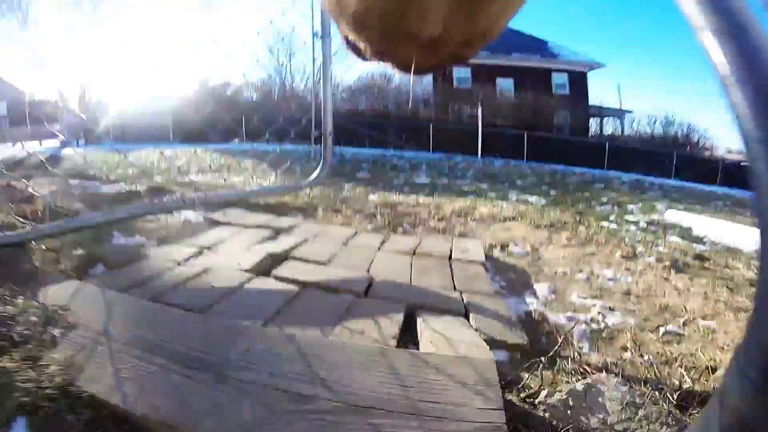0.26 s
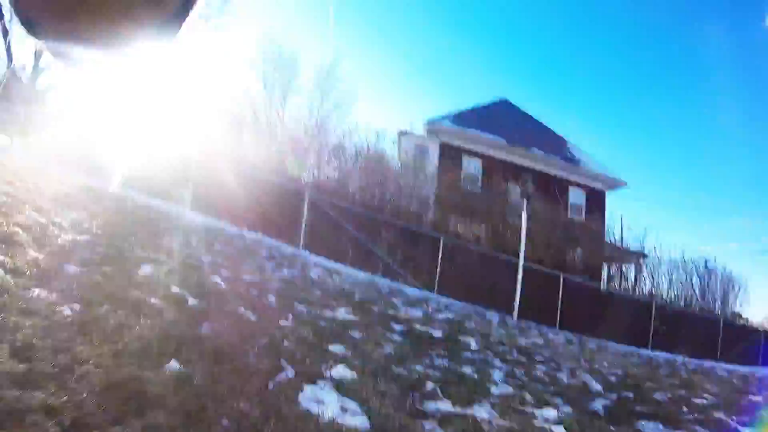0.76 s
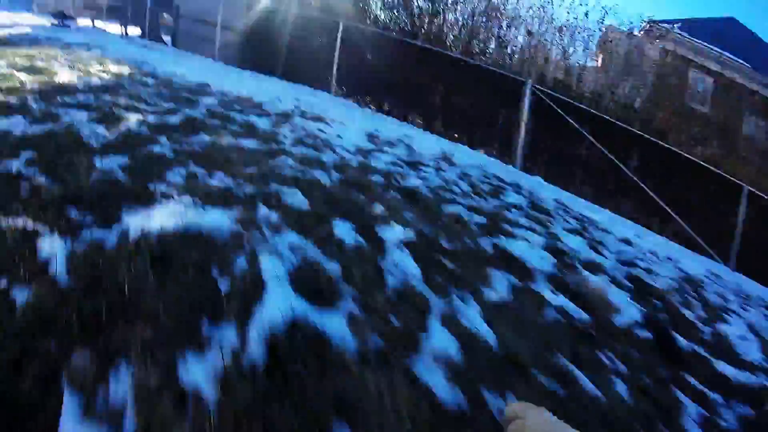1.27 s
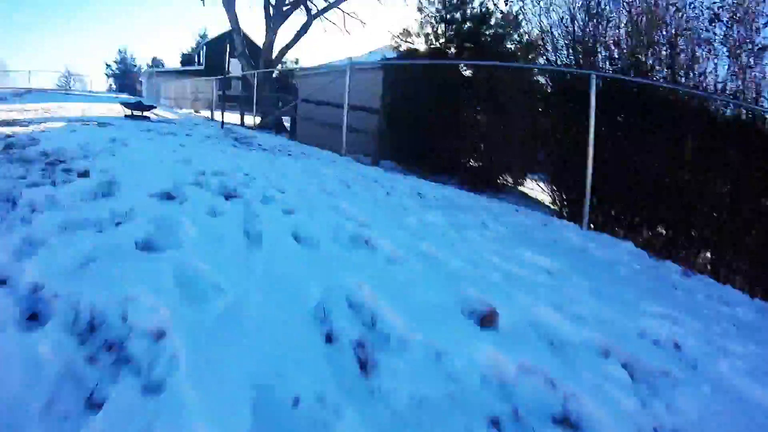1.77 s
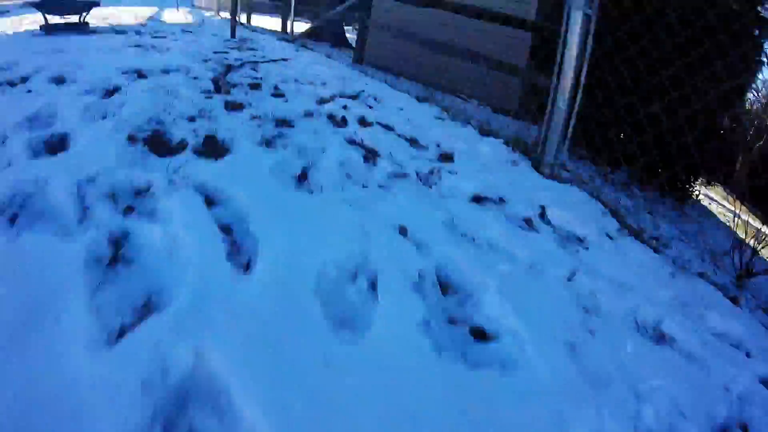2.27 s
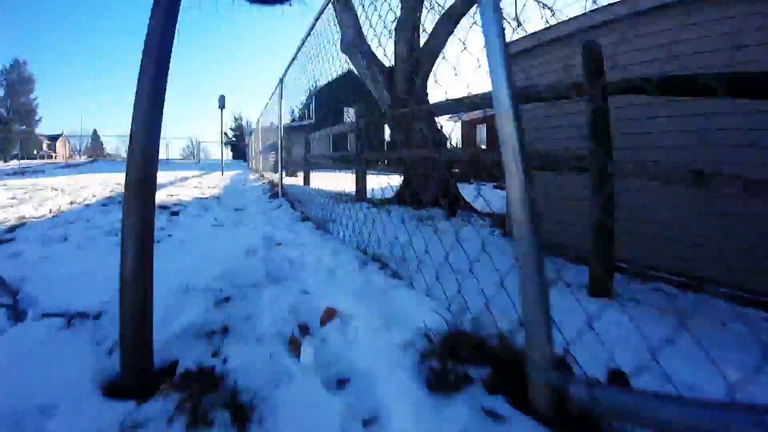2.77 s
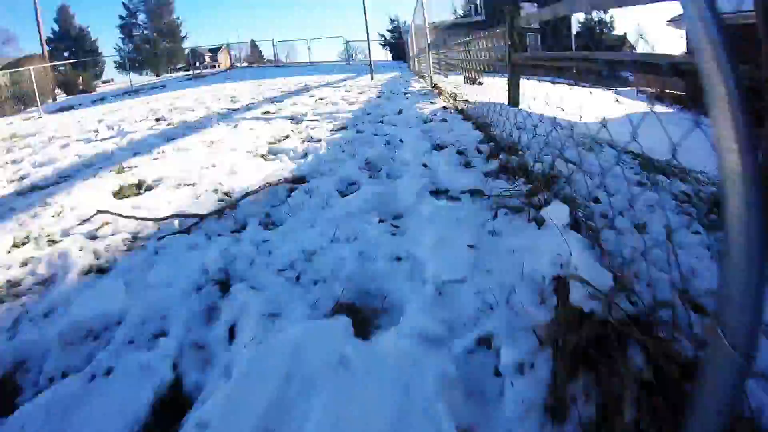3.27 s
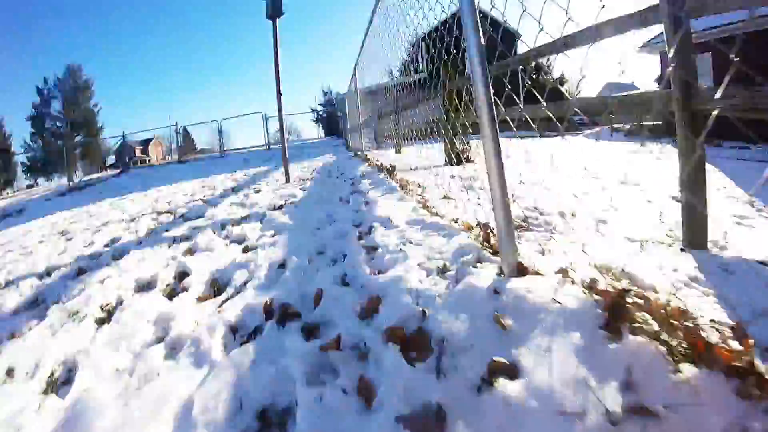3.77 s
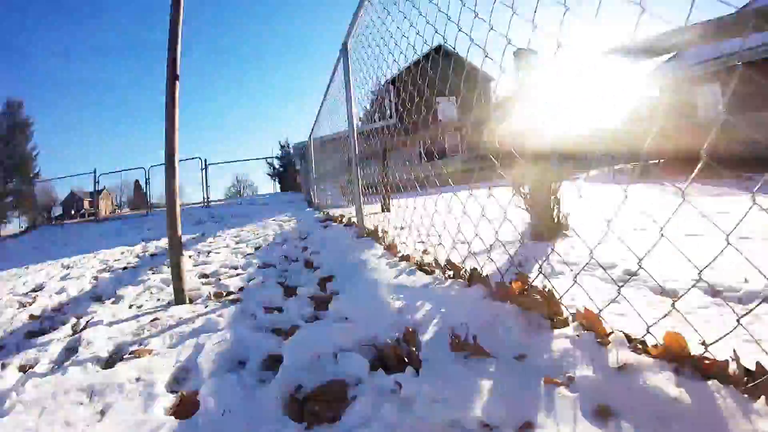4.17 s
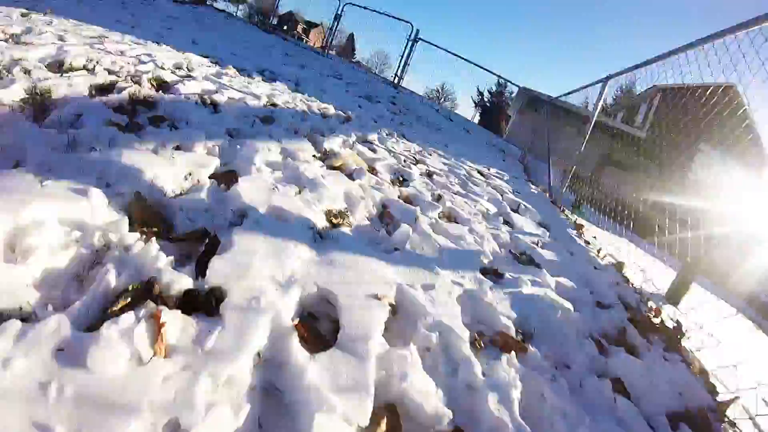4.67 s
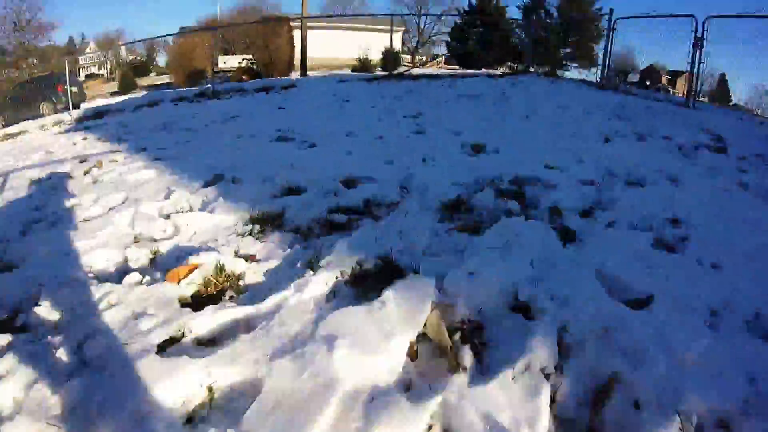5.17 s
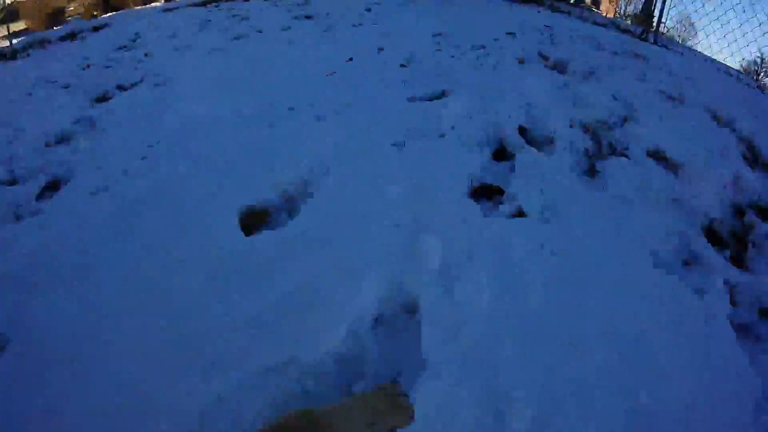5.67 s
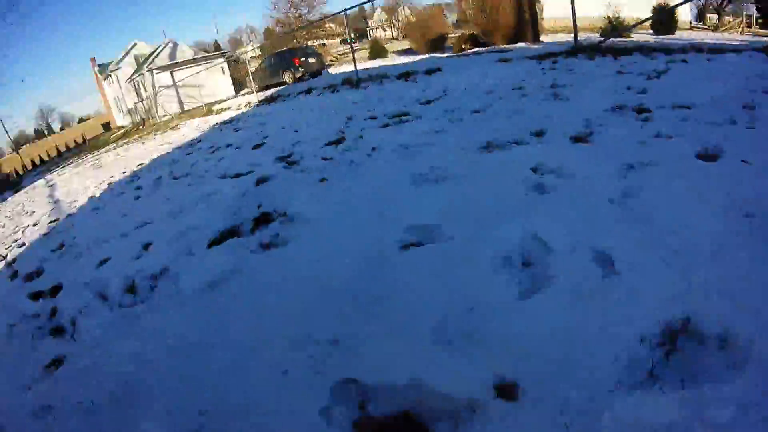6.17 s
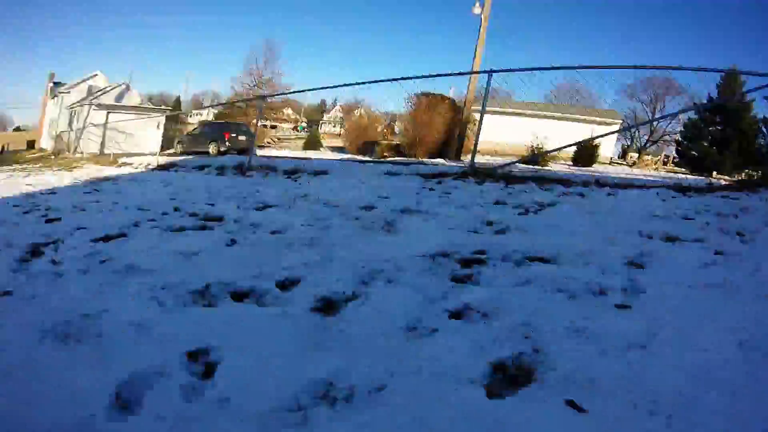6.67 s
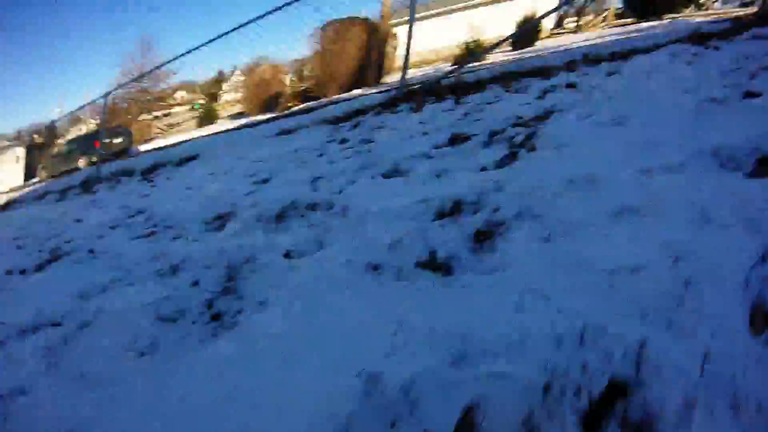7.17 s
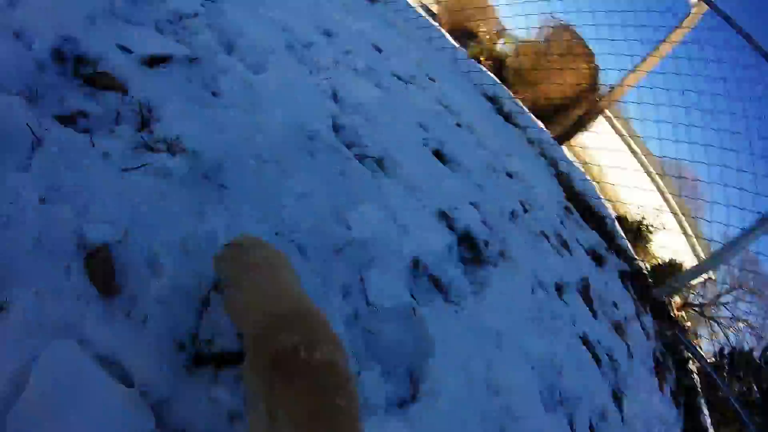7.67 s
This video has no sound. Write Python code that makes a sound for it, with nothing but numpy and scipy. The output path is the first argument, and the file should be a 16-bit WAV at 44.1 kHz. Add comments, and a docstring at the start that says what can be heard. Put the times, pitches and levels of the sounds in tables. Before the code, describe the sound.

A dog gallops across frozen grass and snow, heard very close from a camera hanging on its collar. From start to finish the loudest sound is the plastic housing knocking against its mount, in sharp, uneven single and double clacks about three times a second, the hardest slightly overloaded. Metal tags clink and rattle brightly between them. Low wind buffets the microphone with each stride, strongest in the first second. Quieter paw steps crunch through the crust, clearest from about 2.5 to 6 seconds, with a few hollow landings, notably near 2.9 seconds. The camera thumps dully against the chest around 0.4, 0.9, 2.9, 4, 5 and 6.1 seconds. At 6 seconds a paw briefly scrapes on ice, followed by faint high tag pings. The jingling thins, then returns after 7 seconds with more knocks and three low thumps between 7.4 and 7.7 seconds.

```python
"""Hard plastic knocks and jingling metal, in the rhythm of a dog galloping over frozen grass and snow.
A small camera hung from its collar knocks against its mount at each stride and swings into the chest.
Tags clink beside it, paws crack the crust and thud through the body, and air buffets the microphone.
The loudest knocks overload the input."""
import sys
import numpy as np
from scipy import signal
from scipy.fft import rfft, irfft
from scipy.io import wavfile
from scipy.ndimage import uniform_filter1d

SR = 44100
rng = np.random.default_rng(int(sys.argv[2]) if len(sys.argv) > 2 else 0)


def wav_out(sig):
    """Save sig, one row per channel (or a flat mono array), as 16-bit PCM at SR to the path in sys.argv[1]."""
    wavfile.write(sys.argv[1], SR, np.round(np.clip(np.atleast_2d(sig).T, -1, 1) * 32767).astype(np.int16))


N = 349713
CONTROL_TIMES_S = np.arange(0, N + 64, 64) / SR


def gain_of(db):
    """dB to amplitude."""
    return 10 ** (np.asarray(db) / 20)


def unit_rms(x):
    """Scales x to rms 1."""
    return x / np.sqrt(np.mean(x ** 2) + 1e-20)


def unit_peak(x, window_ms):
    """Scales x so its smoothed envelope peaks at 1."""
    power = uniform_filter1d(x ** 2, max(round(window_ms * SR / 1000), 1))
    return x / np.sqrt(2 * power.max() + 1e-20)


def add(mix, start_s, sound):
    """Mixes sound in at start_s."""
    part = mix[round(start_s * SR):][:len(sound)]
    part += sound[:len(part)]


def lowpass(x, cutoff_hz):
    """Zero-phase low-pass."""
    return signal.sosfiltfilt(signal.butter(2, cutoff_hz, fs=SR, output="sos"), x)


def coloured(x, spectrum):
    """Filters x by (freq_hz, level_db) points; rms 1."""
    bin_hz = np.fft.rfftfreq(N, 1 / SR)
    freq_hz, level_db = np.transpose(spectrum)
    curve_db = np.interp(np.log(bin_hz + 1), np.log(freq_hz + 1), level_db)
    return unit_rms(irfft(rfft(x) * gain_of(curve_db), N))


def flutter(depth_db, window_ms):
    """Randomly wandering gain; depth_db is rms."""
    width = round(window_ms * SR / 1000)
    wander = uniform_filter1d(uniform_filter1d(rng.standard_normal(N), width), width)
    return gain_of(depth_db * unit_rms(wander))


def slips(rate_per_s, fall_ms):
    """Random upward jumps that sink back; zero mean."""
    kicks = rng.random(N) * (rng.random(N) < rate_per_s / SR)
    level = signal.lfilter([1], [1, -np.exp(-1000 / (fall_ms * SR))], kicks)
    return level - level.mean()


def swells(rows, rise_db_per_s, fall_db_per_s, rest_db):
    """Gain that climbs to each row's level, holds, and sinks to rest."""
    power = gain_of(rest_db) ** 2
    for peak_s, level_db, hold_s in rows:
        rise_db = rise_db_per_s * np.maximum(peak_s - CONTROL_TIMES_S, 0)
        fall_db = fall_db_per_s * np.maximum(CONTROL_TIMES_S - peak_s - hold_s, 0)
        power = power + gain_of(level_db - rise_db - fall_db) ** 2
    return np.interp(np.arange(N) / SR, CONTROL_TIMES_S, np.sqrt(power))


def ring(modes, samples, spread_db, rise_ms):
    """Decaying sines, one row a mode; the strike point varies their shares."""
    pitch_hz, level_db, t60_s = np.transpose(modes)[:, :, None]
    t = np.arange(samples) / SR
    share_db = spread_db * rng.standard_normal((len(modes), 1))
    rise = 1 - np.exp(-t * 1000 / rise_ms)
    return rise * gain_of(level_db + share_db - 60 * t / t60_s) * np.sin(2 * np.pi * pitch_hz * t)


def detuned(modes, spread):
    """Shifts each mode's pitch by a random fraction."""
    return modes * (1 + [spread, 0, 0] * rng.standard_normal((len(modes), 1)))


def emphasis(modes, centre_hz, log_width):
    """Bell-shaped weight of each mode around centre_hz, as a column."""
    pitch_hz = np.array(modes)[:, :1]
    return np.exp(-(np.log(pitch_hz / centre_hz) / log_width) ** 2)


# Spectrum of hiss and snow grit: freq_hz, level_db
GRIT_SPECTRUM = [(180, -27.5), (300, -32), (667, 3.5), (1080, -5), (2030, -6.5), (2700, -13.5), (3400, -1),
                 (4400, -6.5), (6620, -8), (13300, -18), (15200, -22.5), (16000, -44)]


def hiss():
    """Faint steady outdoor noise."""
    return gain_of(-79) * coloured(rng.standard_normal(N), GRIT_SPECTRUM)


# Steady rub of fur: time_s, level_db
FUR_RUB = [(1.2, -56), (1.7, -70.5), (2.099, -64), (2.702, -56.5)]
# Paws breaking the crust: peak_s, level_db, hold_s
PAW_STEPS = [(.06, -44.5, 0.06), (.22, -54, 0.29), (.64, -46.5, 0.049), (.928, -42, 0.005),
             (1.245, -40.5, 0.0048), (1.5, -51.5, 0.15), (1.795, -56, 0.033), (1.87, -44, 0.065),
             (2.17, -56.5, 0.25), (2.59, -34.5, 0.021), (2.815, -39, 0.0058), (2.915, -42, 0.041),
             (3.03, -44, 0.0083), (3.15, -47, 0.0085), (3.24, -44, 0.039), (3.49, -51, 0.15),
             (3.755, -46.5, 0.0082), (3.849, -33.5, 0.0049), (3.955, -33, 0.0066), (4.175, -47.5, 0.047),
             (4.31, -41.5, 0.072), (4.535, -33.5, 0.015), (4.66, -34, 0.041), (4.76, -44.5, 0.086),
             (4.898, -35.5, 0.037), (5.15, -51, 0.024), (5.27, -48.5, 0.057), (5.623, -42.5, 0.03),
             (5.71, -35, 0.026), (5.83, -48.5, 0.077), (5.975, -42.5, 0.027), (6.03, -36.5, 0.097),
             (6.375, -46, 0.028), (6.67, -44.5, 0.043), (6.845, -47.5, 0.04), (7.29, -53, 0.16),
             (7.56, -44.5, 0.013), (7.87, -45, 0.069)]
PAW_FALL_DB_PER_S = 365


def snow_crunch():
    """Crust breaks in tiny cracks over a drifting rustle, coloured by the housing's ring."""
    crack_db = 5 * np.minimum(rng.exponential(1, N), 5)
    cracks = gain_of(crack_db) * (rng.random(N) < 800 / SR) * rng.choice([-1, 1], N)
    grit = coloured(.7 * unit_rms(cracks) + rng.standard_normal(N), GRIT_SPECTRUM)
    housing = ring(HOUSING_MODES, samples=2000, spread_db=0, rise_ms=.1).sum(0)
    rustle = signal.oaconvolve(rng.standard_normal(N), housing / np.linalg.norm(housing))[:N]
    frames = signal.stft(grit + .95 * rustle, nperseg=256)[2]
    drift = uniform_filter1d(rng.standard_normal(frames.shape), size=9, axis=0)
    drift = uniform_filter1d(drift, size=7, axis=1)
    texture = signal.istft(frames * gain_of(3 * unit_rms(drift)), nperseg=256)[1][:N]
    fur_db = np.interp(CONTROL_TIMES_S, *np.transpose(FUR_RUB))
    force = swells(PAW_STEPS, rise_db_per_s=2300, fall_db_per_s=PAW_FALL_DB_PER_S, rest_db=fur_db)
    force *= gain_of(9 * slips(rate_per_s=70, fall_ms=6))
    dull = lowpass(texture, cutoff_hz=6760)
    crispness = np.minimum(force / gain_of(-48), 1) ** .33  # soft steps lose treble
    return force * (dull + crispness * (texture - dull))


def ice_skid(peak_s, level_db, hold_s):
    """A paw skids on ice: bright, gritty band noise."""
    band = signal.butter(2, (2930, 4540), "bandpass", fs=SR, output="sos")
    friction = unit_rms(signal.sosfilt(band, rng.standard_normal(N)))
    envelope = swells([(peak_s, level_db, hold_s)],
                      rise_db_per_s=400, fall_db_per_s=PAW_FALL_DB_PER_S, rest_db=-120)
    return envelope * flutter(depth_db=3, window_ms=3) * friction


# Turbulence at the microphone: freq_hz, level_db
WIND_SPECTRUM = [(15, 0), (45, -1), (120, -9.5), (300, -14.5), (700, -23), (1500, -43), (4000, -78)]
# Air rush as the chest swings forward: peak_s, level_db, hold_s
STRIDE_GUSTS = [(0, -27.5, 0.068), (.2, -26.5, 0.24), (.52, -29.5, 0.19), (.945, -32, 0.16),
                (1.1, -36, .12), (1.45, -40, 0.089), (1.85, -39, 0.048), (2.16, -38, 0.15),
                (2.54, -34, 0.11), (2.85, -35, 0.076), (3.15, -33.5, 0.1), (3.51, -33.5, 0.1),
                (3.88, -34, 0.065), (4.23, -36, 0.082), (4.6, -38, 0.076), (4.8, -36, 0.22),
                (5.28, -34.5, 0.047), (5.65, -37, 0.23), (6.04, -34.5, 0.026), (7.23, -39.5, 0.32),
                (7.9, -36.5, 0.041)]


def wind_buffet():
    """Lumpy low turbulence; the rush stops with the swing, the rumble lingers."""
    air = flutter(depth_db=4.46, window_ms=22.8) * coloured(rng.standard_normal(N), WIND_SPECTRUM)
    rumble = lowpass(air, cutoff_hz=108)
    rumble_gain = swells(STRIDE_GUSTS, rise_db_per_s=121, fall_db_per_s=188, rest_db=-51.5)
    rush_gain = swells(STRIDE_GUSTS, rise_db_per_s=121, fall_db_per_s=1200, rest_db=-51.5)
    return rumble_gain * rumble + rush_gain * (air - rumble)


# Hollow paw landings: start_s, level_db, pitch_hz
PAW_THUDS = [(.928, -14, 298), (2.268, -18.5, 220), (2.913, -6.5, 307), (3.63, -19.5, 330),
             (5.623, -16.5, 330), (5.728, -13.5, 312), (6.721, -21.5, 655), (7.017, -25.5, 630)]


def paw_thuds(t60_s=.046):
    """Landings carry up through the body, each one short, rough note."""
    out = np.zeros(N)
    for start_s, level_db, pitch_hz in PAW_THUDS:
        note = ring([(pitch_hz, level_db, t60_s)], samples=2500, spread_db=0, rise_ms=1.96)[0]
        add(out, start_s, note)
    return out * flutter(depth_db=4, window_ms=1)


# Camera hitting the chest: centre_s, level_db, pitch_hz
CHEST_THUMPS = [(0.385, -7.5, 65), (0.932, -15, 101), (2.914, -12, 108), (3.962, -8.5, 124),
                (4.657, -17, 106), (4.986, -12.5, 76.4), (6.117, -10, 85), (7.426, -5, 131),
                (7.565, -9.5, 77.5), (7.702, -5, 120)]


def chest_thumps():
    """Each hit is one brief, low pressure pulse at the microphone."""
    out = np.zeros(N)
    t = np.arange(-SR // 20, SR // 20) / SR
    for centre_s, level_db, pitch_hz in CHEST_THUMPS:
        cycles = t * pitch_hz
        pulse = -np.cos(2 * np.pi * cycles + .41) * np.exp(-(cycles / .26) ** 2)
        add(out, centre_s + t[0], gain_of(level_db) * pulse)
    return out


# Small tag's resonances: pitch_hz, level_db, t60_s
SMALL_TAG_MODES = [(10400, 0, .09), (11800, -14, .06), (15100, -20, .12)]
# Touches on it: start_s, level_db
SMALL_TAG_TOUCHES = [(5.9, -46), (6.288, -45), (6.623, -41), (6.757, -49)]


def small_tag():
    """Faint high pings that tremble as the tag drags over fur."""
    out = np.zeros(N)
    for start_s, level_db in SMALL_TAG_TOUCHES:
        ping = ring(SMALL_TAG_MODES, samples=5000, spread_db=4, rise_ms=.5).sum(0)
        add(out, start_s, gain_of(level_db) * ping)
    return out * flutter(depth_db=4, window_ms=3)


# Tag resonances: pitch_hz, level_db, t60_s
TAG_MODES = [(4910, -3, .06), (5157, 0, .15), (5809, -2, .09), (12240, -13, .12), (12860, -4, .28),
             (13850, -7, .08)]
# Metal-on-metal tick: pitch_hz, level_db, t60_s
TICK_MODES = [(5170, -4.5, 0.02), (6580, -2, 0.016), (8010, 8, 0.011), (10100, -1, 0.0034),
              (13760, -5, 0.0055)]


def clink(start_s, tick_db, ring_re_tick_db, lead_hz):
    """A sharp tick; the thin metal rings until a jolt or its own swing presses it against fur."""
    partials = ring(TAG_MODES, samples=7000, spread_db=4, rise_ms=.1)
    tick = ring(detuned(TICK_MODES, .02), samples=700, spread_db=7, rise_ms=.08).sum(0)
    tick = unit_peak(tick, window_ms=1)
    hang, bounce_delay, bounce = rng.random(3)
    next_jolt_s = min((row[0] for row in housing_hits() if row[0] > start_s + .008), default=np.inf)
    free_s = min(next_jolt_s - start_s, .015 + .04 * hang)
    pressed_s = np.maximum(np.arange(7000) / SR - free_s, 0)
    damping_db_per_s = np.where(np.array(TAG_MODES)[:, :1] < 8000, 3000, 450)  # high modes escape most
    brush_db = np.repeat(4 * rng.standard_normal((len(TAG_MODES), 28)), 250, axis=1)
    brush_db = uniform_filter1d(brush_db, size=150)  # the tags keep brushing
    lead_db = 8 * emphasis(TAG_MODES, lead_hz, log_width=.02)
    ringing = (partials * gain_of(brush_db + lead_db - damping_db_per_s * pressed_s)).sum(0)
    sound = gain_of(ring_re_tick_db) * unit_peak(ringing, window_ms=5)
    add(sound, 0, tick)
    add(sound, .003 + .012 * bounce_delay, .5 * bounce ** 2 * tick)
    return gain_of(tick_db) * sound


# Tag striking its ring: start_s, tick_db, ring_re_tick_db, lead_hz
TAG_CLINKS = [(0.084, -8.5, -37, 4910.0), (0.3138, -32, -7, 5157.0), (0.3527, -32.0, -10, 4910.0),
              (0.4408, -41, -17.0, 5157.0), (0.595, -38.0, -5, 5157.0), (0.6465, -23.5, -5, 5157.0),
              (0.6516, -20, -29, 12860.0), (0.6967, -30, -18.0, 5157.0), (0.7403, -30, -33, 5809.0),
              (0.9293, -22.5, -16.0, 5157.0), (1.1957, -22.5, -7, 4910.0), (1.5274, -32, -20, 13850.0),
              (1.6485, -28.5, -22, 5809.0), (1.8664, -19.5, -24.0, 5809.0), (2.2674, -12.5, -13, 5157.0),
              (2.376, -38, -2, 5157.0), (2.7562, -32, -10, 5809.0), (2.8826, -20.5, -28, 12860.0),
              (2.999, -26, -4.5, 12860.0), (3.0926, -25, -4, 5809.0), (3.2413, -14.0, -36, 5157.0),
              (3.255, -22, -16, 5809.0), (3.3005, -42.0, -6, 12860.0), (3.673, -32.5, -18, 12860.0),
              (3.7272, -35, -4, 4910.0), (3.7967, -26, -8.5, 5157.0), (3.9063, -16, -28.0, 12860.0),
              (4.311, -21, -10, 13850.0), (4.3325, -18, -15, 5809.0), (4.6166, -23.0, -11, 12860.0),
              (4.6355, -23, -17, 5157.0), (4.9301, -35, -21, 12860), (4.9966, -16.5, -12, 12860),
              (5.0819, -36, -23, 12860), (5.2794, -23, -8.5, 4910.0), (5.2996, -26, -24, 4910.0),
              (5.3226, -22, -37.0, 12240.0), (5.9725, -26.5, -1, 5157), (5.9811, -15.5, -2, 5157.0),
              (6.0085, -23, 2, 5157.0), (6.065, -10, -26, 4910.0), (6.2022, -41, -18.0, 12860),
              (7.053, -29, -27, 4910.0), (7.127, -33, -28, 12240.0), (7.3065, -26.5, -28, 4910.0),
              (7.3219, -24.5, -25, 12860.0), (7.362, -43, -11, 5157.0), (7.4063, -20.5, -8, 5809.0),
              (7.508, -28, -13, 4910.0), (7.594, -20, -29, 12860), (7.6115, -34, -30.0, 12860.0),
              (7.7192, -28.0, -20.0, 4910.0)]
# Runs of quick, faint clinks: start_s, end_s, level_db
TAG_RATTLES = [(0.016, 0.138, -23.5), (0.284, 0.755, -37), (1.178, 1.302, -28.5), (1.447, 1.557, -38.5),
               (1.849, 1.91, -28), (2.201, 2.25, -38.5), (2.742, 3.123, -51), (3.806, 4.045, -40),
               (4.102, 4.456, -38), (5.262, 5.455, -37.5), (7.275, 7.901, -44.5)]


def collar_tags(rattle_per_s=85):
    """Single clinks, dense rattles, and faint strays throughout."""
    out = np.zeros(N)
    for row in TAG_CLINKS:
        add(out, row[0], clink(*row))
    strays = (.0064, N / SR, -54.5)
    for start_s, end_s, level_db in TAG_RATTLES + [strays]:
        count = min(round(rattle_per_s * (end_s - start_s)), 100)
        for place, softness, sustain, mode in rng.random((count, 4)):
            time_s = start_s + place * (end_s - start_s)
            lead_hz = TAG_MODES[int(mode * 3)][0]
            add(out, time_s, clink(time_s, level_db + 3 - 18 * softness, -20 + 20 * sustain, lead_hz))
    return out


# Bracket resonances: pitch_hz, level_db, t60_s
BRACKET_MODES = [(176, -38, 0.19), (739, -30, 0.13), (1841, -27.5, 0.09), (3200, -41, 0.06)]


def bracket_ring(dull_db):
    """The bracket rings on after a knock; a dull blow shakes its high modes harder."""
    sharp_drive, dull_drive = .55, 3.5 * gain_of(dull_db)
    is_high = np.array(BRACKET_MODES)[:, 0] > 1000
    drive = np.where(is_high, np.hypot(sharp_drive, dull_drive), sharp_drive)
    return drive @ ring(BRACKET_MODES, samples=5000, spread_db=3, rise_ms=1)


def contact_force(chatter_ms, samples=1500, rebounds_per_s=1100):
    """One blow, its quick rebounds and the fading buzz of loose parts."""
    t_ms = np.arange(samples) * 1000 / SR
    rebound_end_ms = max(chatter_ms - 2.2, .3)
    rebounds = (rng.random(samples) < rebounds_per_s / SR) * (t_ms < rebound_end_ms)
    buzz = gain_of(-5 * np.maximum(t_ms - rebound_end_ms, 0))
    force = (.5 * rebounds + .08 * buzz) * rng.standard_normal(samples)
    force[0] = .47  # the blow
    return force


# Housing hitting its mount: start_s, level_db, dull_db, bright_db, chatter_ms, spot_hz
HARD_KNOCKS = [(.0915, -2, -11, -4, 1.8, 3570), (.1176, -6, -6.5, -5.5, 5.6, 1680),
               (.4041, -4.5, -19, -4, 3.86, 3100), (.4561, -6.5, -4, -13, 2, 1032),
               (.6696, 2, -33.5, -9.5, 3.9, 3000), (.6802, -5, -27, -18, 2.2, 1710),
               (.954, -6, -1, -14, 1.9, 1720), (1.228, -10.5, -33, -4.5, 8.7, 3000),
               (1.2427, 0.5, -71, -5, 1.6, 1410), (1.5642, 1.5, -12, -8.5, 4.4, 3580),
               (1.5723, -10, -30, 1, 2.7, 3140), (1.6336, -4, -20, -7, 2.15, 1630),
               (1.9126, -5.5, -15.5, -7, 7.4, 2890), (1.935, -4.5, -42, -5, 2.2, 3450),
               (2.2729, -12.5, -11, -15, 16.3, 3200), (2.2878, 2.5, -15, -10.5, 4.13, 2460),
               (2.3343, -9, -10, 0.5, 2, 3470), (2.3477, -19, -29, -8, 2, 1440),
               (2.5891, -9, -17, -2.5, 7.7, 2940), (2.6003, -13, -28, -2, 10.3, 3080),
               (2.615, -10, -26, -31, 4.9, 1950), (2.6295, -12.5, -22, -10, 5.2, 3500),
               (2.9283, -3.5, -19, -10, 5.4, 2600), (2.958, -20, -28, -4.5, 2.5, 3000),
               (3.2663, -5.5, -43, -7, 8, 3000), (3.3841, -27.5, -29, 1, 9.6, 4220),
               (3.4895, -26, -20, 0, 2.3, 3200), (3.585, -2, -41, -2, 4.94, 3900),
               (3.9573, 2.5, -24, -9.5, 3, 2344), (3.9807, -14, -27, -5, 11.5, 3020),
               (4.3157, -5.5, -22, -7, 3.64, 3020), (4.3691, -19, -39, -30, 1.9, 1486),
               (4.6641, -11, -21, -21, 3.15, 3480), (4.6813, -9.5, -48, -2, 9.26, 3300),
               (5.0315, -3, -59, -9.5, 2, 1425), (5.0362, -1.5, -45, -7, 2, 2270),
               (5.7297, -9, -22, 0.5, 7.2, 3100), (6.128, -1.5, -41, -8, 4.4, 3540),
               (6.1353, -7.5, -34, -4.5, 5.7, 3330), (6.1482, -17.5, -2.5, -6, 3.1, 1820),
               (6.2976, -10.5, 2.5, -14.5, 3.6, 1015), (6.512, 0, -11, -9, 7.4, 3650),
               (6.5304, -18.5, -18.5, -5.5, 4, 2250), (7.0659, 1, -31, -46, 2.2, 1470),
               (7.4246, 0.5, -13.5, -5, 1.8, 3500), (7.4974, -3.5, -0.5, -16, 4.4, 1050),
               (7.5822, -9.5, -0.5, -12.5, 1.6, 2450), (7.7009, 0, -9, -13, 1.7, 3480),
               (7.886, -17, -14, -12, 3.1, 3100), (7.9035, -7.5, -33, -11, 6.4, 2440),
               (7.9204, -5.5, -13.5, -16, 6.3, 2440)]
# Housing dropping back on the collar: start_s, level_db
SOFT_BUMPS = [(0.2011, -19), (0.812, -22), (1.0841, -24.5), (1.714, -28), (1.8801, -17.5), (2.082, -19.5),
              (2.444, -28), (2.79, -24.5), (3.4406, -18), (4.065, -26), (6.249, -30.5), (6.2642, -27),
              (7.204, -18)]


def housing_hits():
    """Hard knocks and soft bumps in time order; the bumps share one dull tone."""
    dull_db, bright_db, chatter_ms, spot_hz = 3.5, -29, 5, 1070
    return sorted(HARD_KNOCKS + [(*row, dull_db, bright_db, chatter_ms, spot_hz) for row in SOFT_BUMPS])


# Plastic housing's resonances: pitch_hz, level_db, t60_s
HOUSING_MODES = [(452, -0.5, 0.015), (1126, 1.5, 0.017), (1494, 10, 0.0092), (2030, 17.5, 0.0064),
                 (2260, 3.5, 0.016), (2740, 18, 0.0042), (3114, 6.5, 0.013), (4055, -4.5, 0.015),
                 (5045, 8.5, 0.0076), (5920, 18.5, 0.0032), (6760, 6, 0.0048), (7480, 7.5, 0.0033),
                 (9480, 5, 0.0049), (12900, -6, 0.0073)]


def housing_knocks():
    """Each hit rings housing and bracket; the struck spot favours modes near spot_hz."""
    out = np.zeros(N)
    for start_s, level_db, dull_db, bright_db, chatter_ms, spot_hz in housing_hits():
        force = contact_force(chatter_ms)
        modes = detuned(HOUSING_MODES, .022)  # the grip detunes it
        pitch_hz = modes[:, 0]
        partials = ring(modes, samples=1800, spread_db=2, rise_ms=.12)
        partials *= gain_of(16.8 * emphasis(modes, spot_hz, log_width=.14))
        bands = (0, 800, dull_db, force[:40]), (800, 4500, 0, force), (4500, SR, bright_db, force)
        for low_hz, high_hz, band_db, drive in bands:
            response = partials[(pitch_hz > low_hz) & (pitch_hz <= high_hz)].sum(0)
            knock = unit_peak(signal.oaconvolve(drive, response), window_ms=2.5)
            add(out, start_s, gain_of(level_db + band_db) * knock)
        add(out, start_s, gain_of(level_db) * bracket_ring(dull_db))
    return out


def scene():
    """Mono mix of collar, strides and hiss."""
    collar = housing_knocks() + collar_tags() + small_tag() + chest_thumps()
    strides = paw_thuds() + wind_buffet() + snow_crunch()
    skid = ice_skid(peak_s=6.04, level_db=-32.5, hold_s=.045)
    return (collar + strides + skid + hiss())[None]


def record(dry):
    """Input saturation on the hardest knocks, microphone treble droop, then the band limit."""
    saturated = dry / (1 + dry ** 4) ** .25
    dulled = signal.sosfilt(signal.butter(4, 15000, fs=SR, output="sos"), saturated)
    band_limit = signal.firwin(511, 16300, window=("kaiser", 9), fs=SR)
    return signal.oaconvolve(dulled, band_limit[None], "same")


dry = scene()
out = record(dry)
wav_out(out)
```